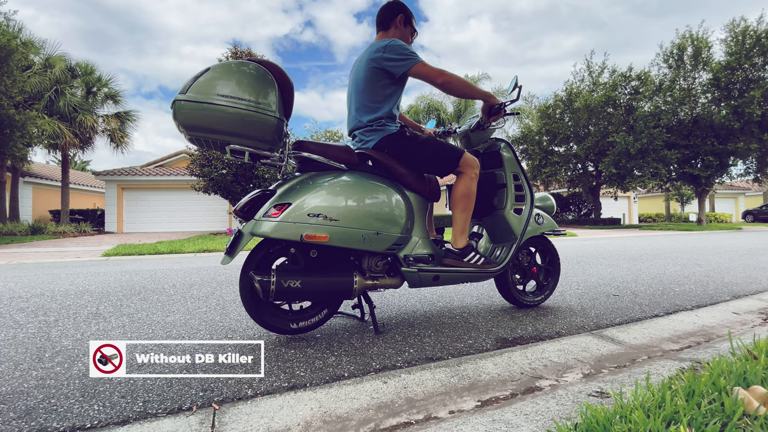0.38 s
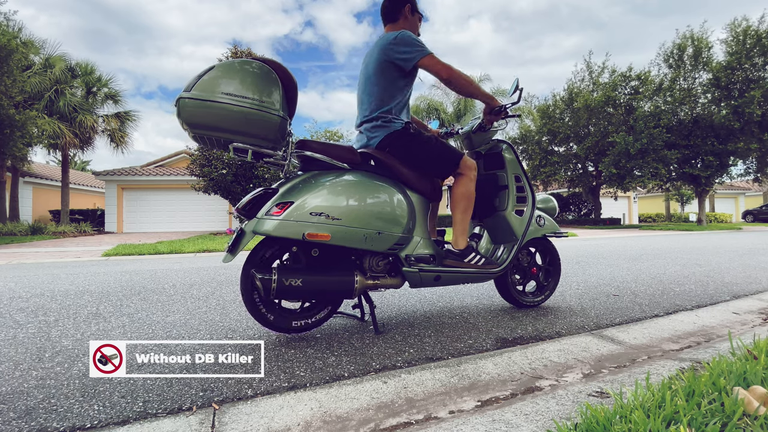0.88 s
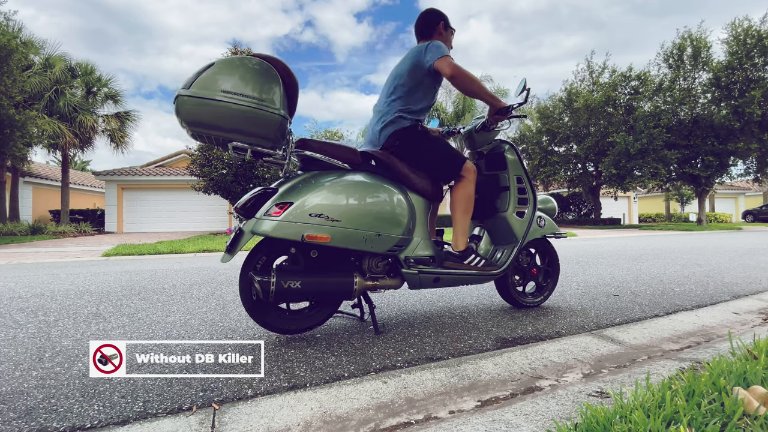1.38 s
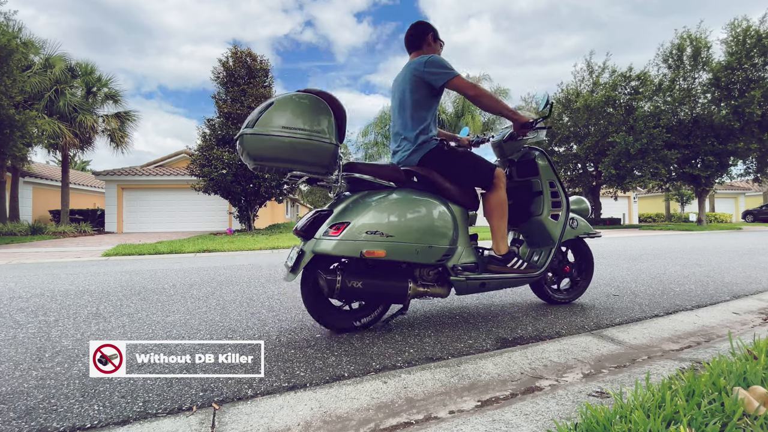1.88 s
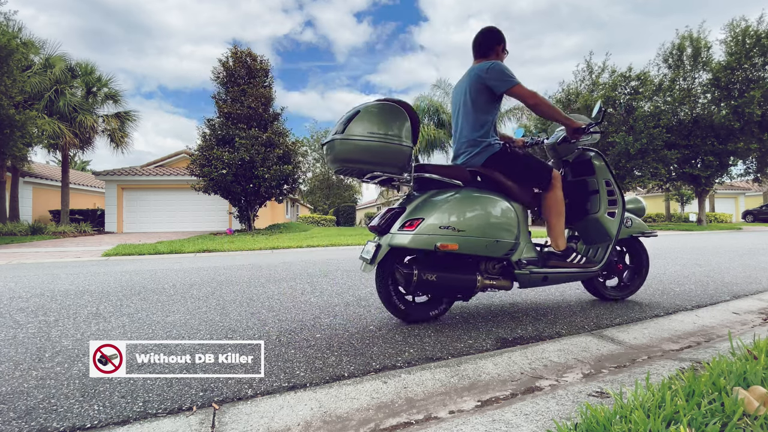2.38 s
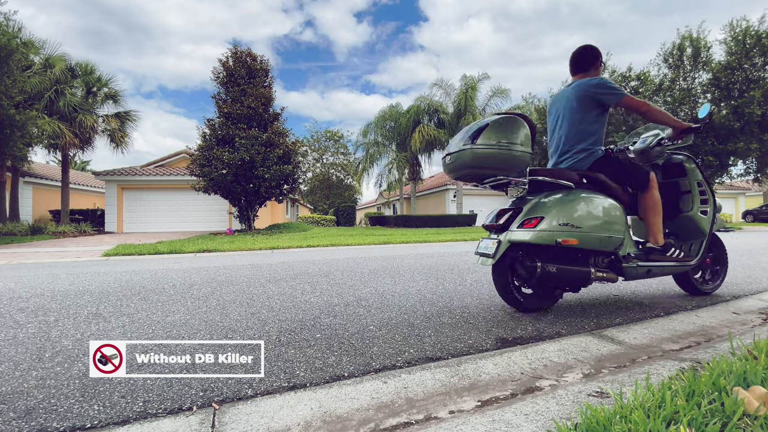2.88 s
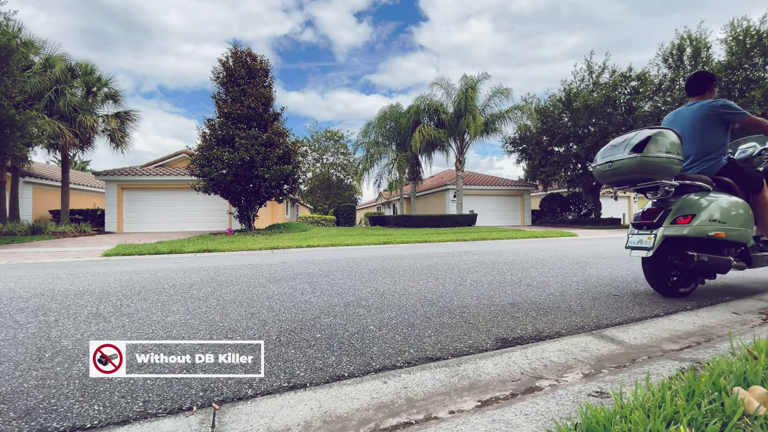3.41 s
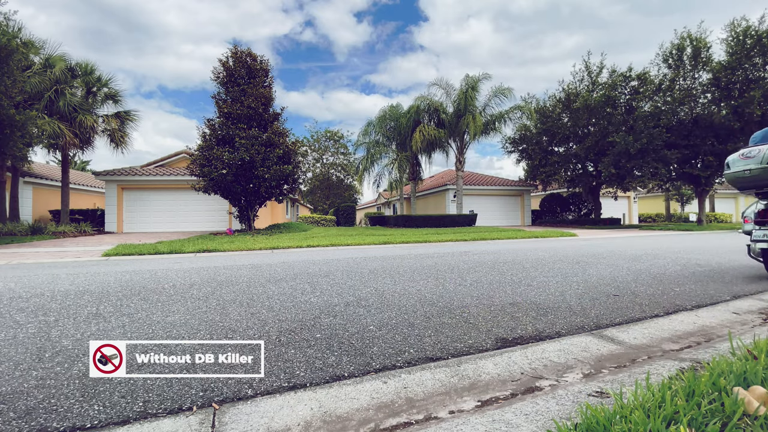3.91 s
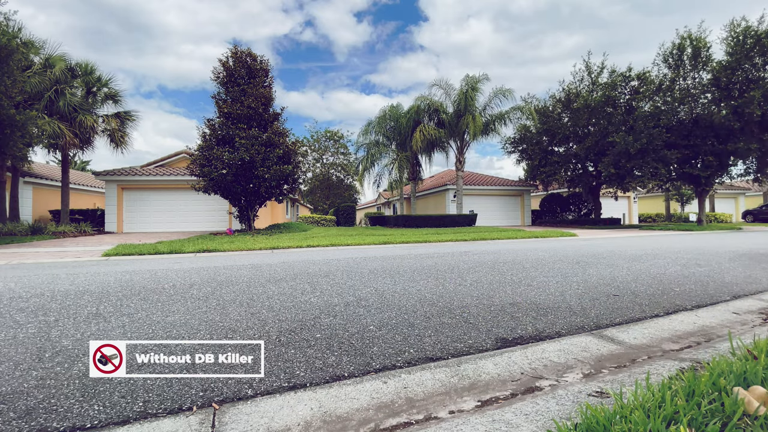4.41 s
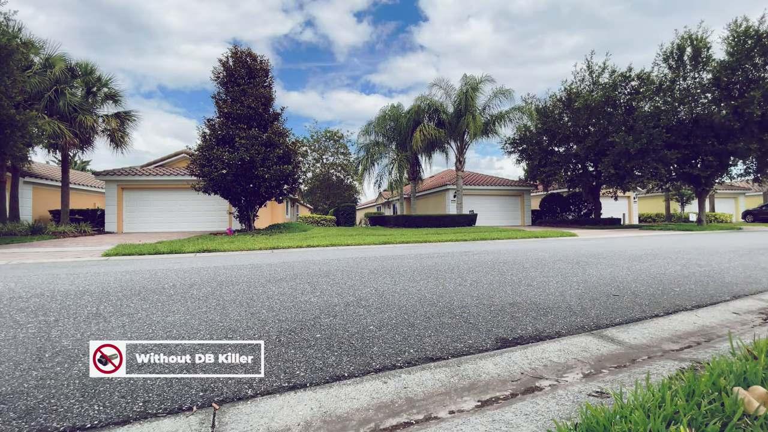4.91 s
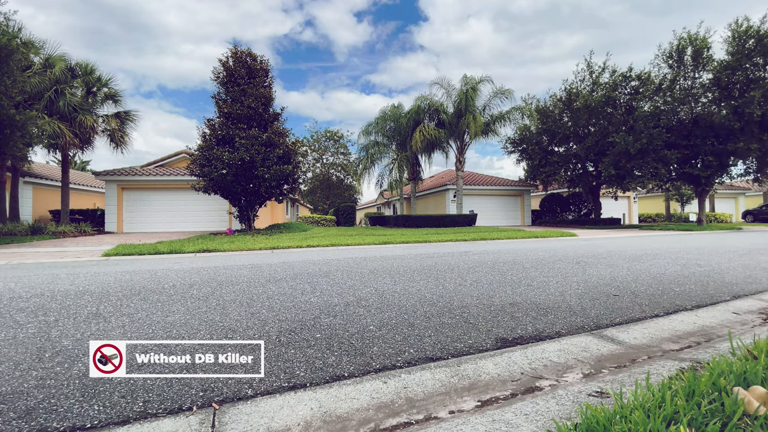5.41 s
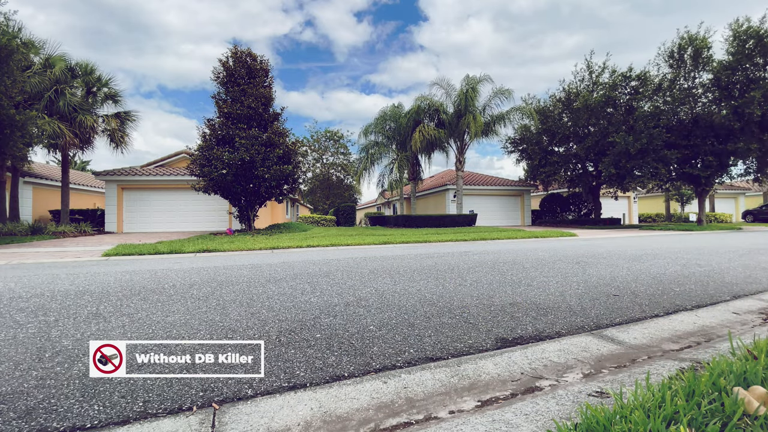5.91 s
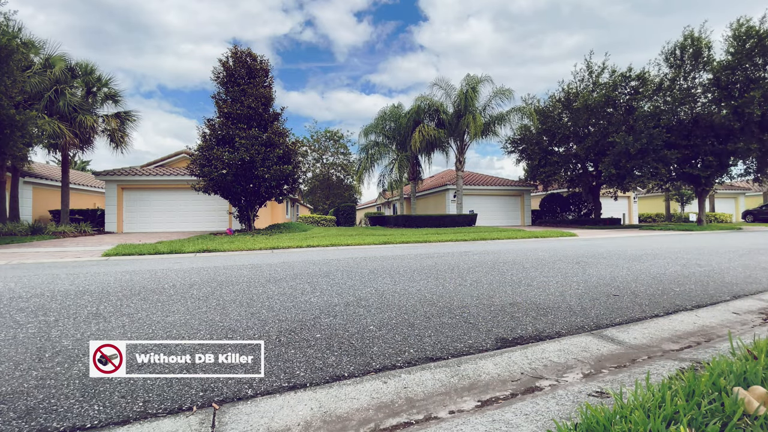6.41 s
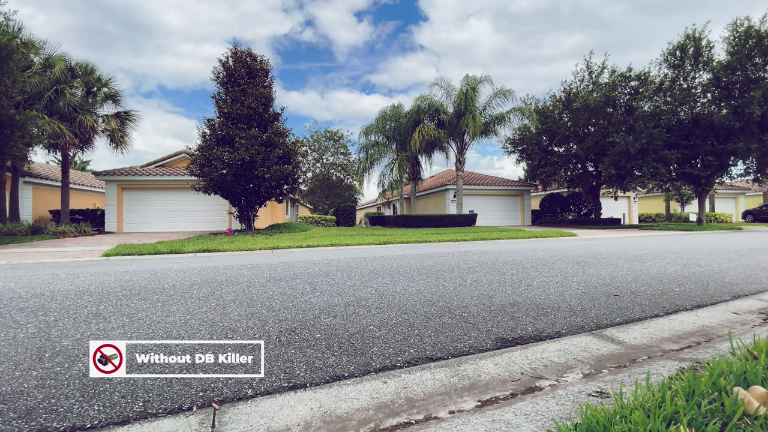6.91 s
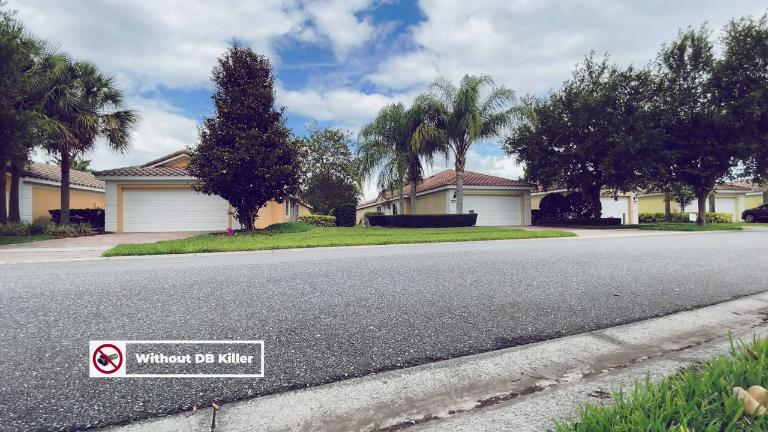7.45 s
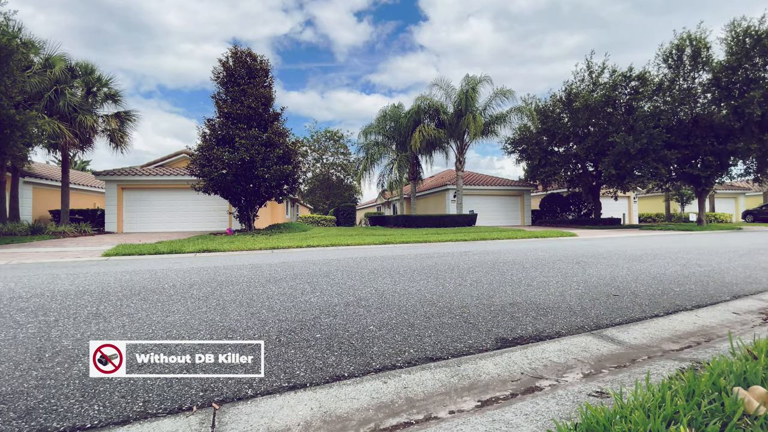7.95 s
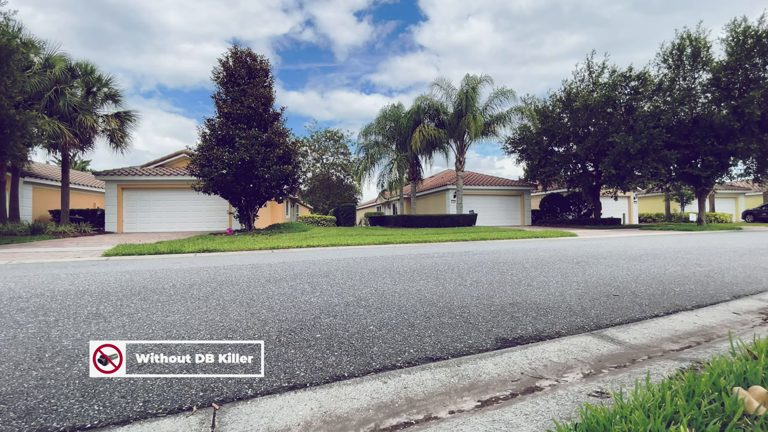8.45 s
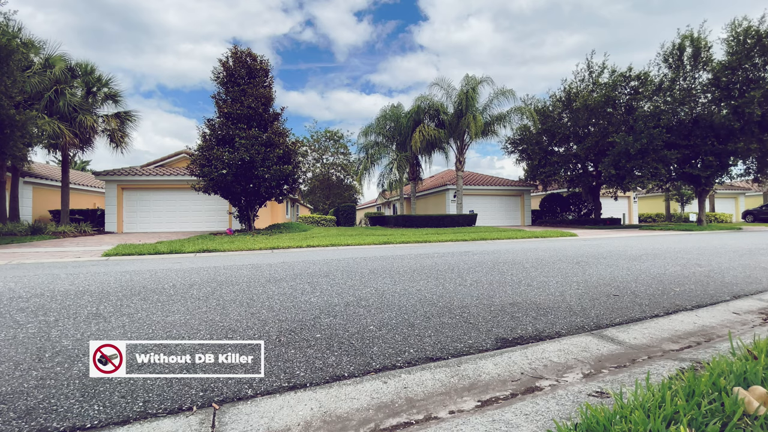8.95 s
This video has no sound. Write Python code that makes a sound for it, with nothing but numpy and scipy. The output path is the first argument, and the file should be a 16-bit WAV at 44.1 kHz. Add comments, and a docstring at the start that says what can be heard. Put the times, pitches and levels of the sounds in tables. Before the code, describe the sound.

A small single-cylinder scooter thumps at a loud open-exhaust idle, scrapes its stand, then barks into full throttle and fades far down the street.

```python
"""Scooter leaving a quiet street

A single-cylinder scooter with an open exhaust idles a few metres off, revs up and rides away down the street.
Each firing sends a gas pulse that rings the pipe and silencer; valve gear clatters and rings the engine casing,
gas hisses and puffs from the outlet, the gears whine in two swells and the stand scrapes.
House fronts return dull echoes over a low street murmur.
Near by, the pulses overload the microphone, which flattens their tops."""
import sys
import numpy as np
from scipy import signal
from scipy.fft import rfft, irfft, next_fast_len
from scipy.io import wavfile

SR = 44100
rng = np.random.default_rng(int(sys.argv[2]) if len(sys.argv) > 2 else 0)


def boost(x):
    """Linear amplitude factor 10**(x/20) for a level x in decibels (scalar or array-like)."""
    u = np.asarray(x, float) / 20
    return 10 ** u


def unload_wav(signal):
    """Save mono or channel-first audio to the path in sys.argv[1] as 16-bit WAV at rate SR, clipped to [-1, 1]."""
    wavfile.write(
        sys.argv[1],
        SR,
        np.round(np.clip(np.atleast_2d(signal).T, -1, 1) * 32767).astype(np.int16),
    )


N = 399987
RUN_IN = SR // 4  # samples computed ahead of time zero and then dropped
LENGTH = N + RUN_IN

# engine speed: (time [s], firings per second [1/s])
FIRING_RATE = [(0.0, 24.67), (0.1, 19.33), (0.36, 15.22), (0.68, 14.09), (1.58, 14.68), (1.69, 13.93),
               (1.88, 25.47), (2.14, 34.55), (2.36, 36.3), (2.99, 36.41), (3.3, 36.16), (3.92, 36.19),
               (4.6, 38.39), (5.2, 39.22), (5.6, 42.71), (5.98, 44.69), (6.45, 44.9), (6.9, 46.25),
               (7.2, 45.71), (9.07, 45.59)]
# throttle: (time [s], opening [0-1])
THROTTLE_OPENING = [(0, .12), (.2, 0), (1.76, 0), (1.85, .35), (1.95, .8), (2.05, 1), (9.07, 1)]
# distance of the exhaust from the kerb: (time [s], distance [m])
DISTANCE_M = [(0, 3.17), (2.7, 3.12), (3.6, 5.7), (4.4, 11), (5.0, 17), (5.4, 25.4), (6.0, 39), (6.5, 52),
              (7.3, 66), (8.4, 97), (9.07, 114)]
# pipe and silencer modes with cool gas at idle: (frequency [Hz], relative level [dB], t60 [s], sign)
COOL_PIPE_MODES = [(50.5, -7.3, 0.069, 1), (88.0, 4.6, 0.096, 1), (114.8, 8.5, 0.059, 1),
                   (189.3, 16.3, 0.022, -1), (285.6, -1.9, 0.052, -1), (355.3, 17.0, 0.023, 1),
                   (437.1, 16.9, 0.013, -1), (593.1, 4.7, 0.035, 1)]
# the same with hot gas under load: (frequency [Hz], relative level [dB], t60 [s], sign)
HOT_PIPE_MODES = [(48.5, -23, 0.14, -1), (93.17, -5, 0.12, 1), (98.1, -10, 0.11, -1),
                  (135.5, -28.5, 0.1, 1), (204.5, 4, 0.022, 1), (243.6, -15, 0.049, -1),
                  (291, -14.5, 0.055, -1), (368.4, 7, 0.035, -1), (445.3, -6.5, 0.061, 1),
                  (575, -1.5, 0.024, -1), (636.7, -3.5, 0.063, -1), (705, -10, 0.051, -1),
                  (1084, -8, 0.05, 1), (1440, -15, 0.048, -1)]
# boom, bark and crack of the exhaust: (level at idle [dB], gain under load [dB], lag behind the throttle [s],
# loss per doubled distance [dB])
EXHAUST_VOICES = [(0.2, 11.5, 0.088, 5), (0.5, 14, 0.013, 6.5), (1.6, 10.5, 0.0059, 6.1)]
# brief swells and dips on the way: (time [s], width [s], boom [dB], bark [dB])
VOICE_SWELLS = [(2.02, 0.075, -1.5, 4), (4.9, 0.14, 2, -0.5), (5.5, 0.23, -2, -4), (6.35, 0.22, 3.5, -3),
                (6.66, 0.11, -1.5, -8), (6.82, 0.076, -10, 7), (7.03, 0.095, -1.5, -18),
                (7.26, 0.047, -2.5, 4.5), (7.66, 0.079, -6.5, 4), (8.08, 0.16, -10.5, 4),
                (8.9, 0.2, -5, 4.5)]
# rasp: gain of the upper modes at full throttle: (time [s], level [dB])
RASP_GAIN = [(0, 7), (2.2, 2.5), (3.5, -1), (4.5, -0.5), (5.3, 6), (6, 6), (7, 3), (8, 1.5), (9.07, 2)]
# mechanical noise: (time [s], clatter [dB], hiss [dB], outlet puff [dB])
MECHANICS_LEVELS = [(0, -39.5, -56, -52), (0.35, -45.5, -58.5, -56), (1.29, -42.5, -59, -54.5),
                    (1.77, -40.5, -54, -51), (2.09, -30.5, -45, -37), (2.4, -27.5, -44, -35),
                    (2.95, -30, -39.5, -41), (3.56, -34.5, -44, -41), (3.91, -38, -48, -45),
                    (4.27, -40, -48.5, -41), (5.1, -42, -50, -46), (5.96, -41.5, -56.5, -61),
                    (6.47, -42, -53.5, -58), (6.85, -44.5, -60.5, -67), (8.46, -55, -70, -84),
                    (9.07, -56, -80, -79)]
# brief rises of clatter and hiss: (time [s], width [s], clatter [dB], hiss [dB])
TICK_GAINS = [(0.0, 0.015, 10, 9.9), (1.845, 0.013, 10.5, 6.2)]
# noise bursts in one engine cycle, over a steady floor, at idle and under load:
# (place [share of cycle], width [share of cycle], clatter [dB], hiss [dB], puff [dB])
IDLE_CYCLE_BURSTS = [(.045, .015, -6, -3, 11), (.36, .06, 4, 2, 10), (.62, .04, -4, -12, -9),
                     (.83, .05, -1, -9, -3)]
LOAD_CYCLE_BURSTS = [(.12, .025, -6, 0, 20), (.6, .12, -6, -12, -9)]
# noise colours: (frequency [Hz], relative level per Hz [dB])
CLATTER_SPECTRUM = [(470, -1), (800, -3.5), (1570, -4), (1810, -5.5), (2350, -3.5), (3080, -6.5),
                    (5250, -12.5), (6770, -22), (7500, -20), (9750, -42), (16500, -120)]
HISS_SPECTRUM = [(3530, -25), (6000, -3.5), (6820, -6.5), (9080, 0.5), (12000, -1), (15600, -32),
                 (22000, -120)]
PUFF_SPECTRUM = [(8000, -32), (10500, -16), (12500, 0), (14500, -1), (16000, -7)]
# engine casing modes rung by the clatter: (frequency [Hz], relative level [dB], t60 [s])
CASING_MODES = [(1410, -4, 0.023), (2004, -5, 0.03), (2314, -4.5, 0.025), (2646, -5, 0.027),
                (2885, -12.5, 0.024), (4420, -6.5, 0.016)]
# gear whine: (time [s], width [s], level [dB])
WHINE_LEVELS = [(6.68, 0.14, -45.5), (7.45, 0.3, -57)]
# the stand scrapes and folds: (start [s], length [s], level [dB])
STAND_SCRAPES = [(1.398, 0.084, -43)]
# metal scrape: (frequency [Hz], relative level per Hz [dB])
SCRAPE_SPECTRUM = [(700, -30), (1300, 4), (3000, -7), (6500, -12), (8700, -6), (11000, -9), (16000, -21)]
# house fronts, whose detour changes: (delay as the run-in starts [s], change of delay [s per s], level [dB])
HOUSE_ECHOES = [(.030, .0015, -5), (.075, -.002, -3), (.050, .003, -3)]
# level of the echoes, faint near by and growing from 3.5 s on: (time [s], level [dB])
ECHO_LEVEL = [(0, -27.5), (3.5, -40), (5, -18), (6.5, -14), (9.07, -9.5)]
# street murmur: (frequency [Hz], relative level per Hz [dB])
STREET_SPECTRUM = [(20, -30), (50, -27), (90, 3), (200, -4.5), (500, 0.5), (1000, -13), (2800, -15.5),
                   (6000, -34), (15500, -42)]

FIRST_TURN, FIRING_DELAY_S = .51, .0011  # engine cycles done at time zero; short delay of the firings
BARK_FROM_HZ, CRACK_FROM_HZ, RASP_FROM_HZ = 150, 300, 430  # modes up to the first belong to the boom
COOL_PULSE_HZ, HOT_PULSE_HZ, OUTLET_HZ = 325, 150, 1750  # low-pass corners
WAVER_DB_PER_100_M, WAVER_HZ, WAVER_FROM_HZ = 2.5, 2.5, 120  # depth, corner of the drift, lower limit
CASING_DB = -8.5  # before the clatter level is applied
WHINE_AT_S, WHINE_HZ, WHINE_HZ_PER_S = 6.7, 1580, 170  # mean pitch at that time, and its rise
STREET_DB = -53
OVERLOAD = 0.28  # ceiling of the microphone, where full scale is 1
SELF_NOISE_DB, LOW_CUT_HZ = -67, 6


def clock():
    """Seconds at each sample, starting before time zero."""
    return (np.arange(LENGTH) - RUN_IN) / SR


def in_time(rows):
    """Columns of a table as curves, starting before time zero."""
    s, *columns = np.transpose(rows)
    return [np.interp(clock(), s, column) for column in columns]


def bells(rows):
    """Each column as a sum of bell-shaped bumps in time."""
    return sum(np.array(heights)[:, None] * np.exp(-.5 * ((clock() - s) / width) ** 2)
               for s, width, *heights in rows)


def rms_one(x):
    """Scale to rms 1."""
    return x / np.sqrt(np.mean(x ** 2) + 1e-20)


def soften(x, hz):
    """Double one-pole low-pass."""
    r = np.exp(-2 * np.pi * hz / SR)
    return signal.lfilter([(1 - r) ** 2], [1, -2 * r, r * r], x)


def drift(hz):
    """Low-passed chance with rms 1."""
    return rms_one(soften(rng.standard_normal(LENGTH), hz))


def coloured(spectrum):
    """White noise shaped to a spectrum; rms 1."""
    size = next_fast_len(LENGTH)
    hz, level_db = np.transpose(spectrum)
    bins_hz = np.arange(1, size // 2 + 2) * SR / size
    shape = boost(np.interp(np.log(bins_hz), np.log(hz), level_db))
    return rms_one(irfft(rfft(rng.standard_normal(size)) * shape, size)[:LENGTH])


def ring(clicks, hz, t60):
    """Resonator: a unit click sets a sine of height 1 ringing, which decays 60 dB in t60 seconds."""
    r, w = boost(-60 / (t60 * SR)), 2 * np.pi * hz / SR
    return signal.lfilter([0, np.sin(w)], [1, -2 * r * np.cos(w), r * r], clicks + 1e-18)


def crank():
    """Engine cycles completed at each sample: the summed firing rate, with a short fixed delay."""
    rate = in_time(FIRING_RATE)[0]
    turns = np.cumsum(rate) / SR
    return turns - turns[RUN_IN] + FIRST_TURN - FIRING_DELAY_S * rate


def per_cycle(turns, spread_db, count):
    """Random gains that hold for one engine cycle; a row each."""
    cycle = np.floor(turns - turns[0]).astype(int)
    luck = rng.standard_normal((cycle[-1] + 1, count))
    return boost(spread_db * luck[cycle].T)


def voices_db(throttle):
    """Each voice gains with load and fades with distance; boom and bark also swell and dip."""
    metres = in_time(DISTANCE_M)[0]
    doublings = np.log2(metres / metres[0])
    out = []
    for idle_db, load_db, lag_s, loss_db in EXHAUST_VOICES:
        load = soften(throttle, 1 / (2 * np.pi * lag_s))
        out.append(idle_db + load_db * load - loss_db * doublings)
    out = np.array(out)
    out[:2] += bells(VOICE_SWELLS)
    return out


def exhaust(turns, throttle):
    """One gas pulse a cycle rings the modes; combustion varies a little from cycle to cycle."""
    firings = np.diff(np.floor(turns), prepend=np.floor(turns[0]))
    firings = firings * per_cycle(turns, spread_db=0.46, count=1)
    boom, bark, crack = firings * boost(voices_db(throttle)) * per_cycle(turns, spread_db=0.23, count=3)
    # the rasp of the upper modes weakens, returns and weakens again during the ride
    rasp = crack * boost(throttle * in_time(RASP_GAIN)[0])
    strikes = boom, bark, crack, rasp
    waver_db = WAVER_DB_PER_100_M * in_time(DISTANCE_M)[0] / 100
    gas_states = ((COOL_PIPE_MODES, 1 - throttle, COOL_PULSE_HZ),
                  (HOT_PIPE_MODES, throttle, HOT_PULSE_HZ))
    out = np.zeros(LENGTH)
    for modes, share, pulse_hz in gas_states:
        for hz, level_db, t60, sign in modes:
            voice = np.searchsorted([BARK_FROM_HZ, CRACK_FROM_HZ, RASP_FROM_HZ], hz)
            pulses = strikes[voice]
            if hz > WAVER_FROM_HZ:  # far off, moving air makes these modes waver
                pulses = pulses * boost(waver_db * drift(WAVER_HZ))
            ringing = ring(pulses * share, hz, t60)
            out += np.sign(sign) * boost(level_db) * soften(ringing, pulse_hz)
    return soften(out, OUTLET_HZ)


def gates(turns, bursts, spread_db):
    """Steady floor plus bell-shaped bursts at fixed crank angles, of varying strength; a row per layer."""
    out = np.ones((3, LENGTH))
    luck = per_cycle(turns - turns[0] % 1, spread_db, count=len(bursts))
    for (angle, width, *layers_db), gain in zip(bursts, luck):
        bell = np.exp(-.5 * ((turns % 1 - angle) / width) ** 2)
        out += boost(np.array(layers_db))[:, None] * gain * bell
    return out / np.sqrt(np.mean(out ** 2, axis=1, keepdims=True))


def rattle(gate):
    """Uneven metal taps, denser in the bursts, ring the casing; rms 1."""
    struck = rng.random(LENGTH) < 900 * gate ** 2 / SR  # 900 taps a second where the gate is 1
    strength = boost(2.8 * np.minimum(rng.exponential(1, LENGTH), 3))
    taps = struck * strength * rng.choice([-1, 1], LENGTH)
    dealt = rng.integers(0, len(CASING_MODES), LENGTH)  # each tap rings one mode
    return rms_one(sum(boost(level_db) * ring(taps * (dealt == k), hz, t60)
                       for k, (hz, level_db, t60) in enumerate(CASING_MODES)))


def mechanics(turns, throttle):
    """Valve clatter, gas hiss and outlet puffs throb with the crank and flutter in the moving air."""
    clatter_db, hiss_db, puff_db = in_time(MECHANICS_LEVELS)
    clatter_db, hiss_db = (clatter_db, hiss_db) + bells(TICK_GAINS)
    idle_gate = gates(turns, IDLE_CYCLE_BURSTS, spread_db=2.3)
    load_gate = gates(turns, LOAD_CYCLE_BURSTS, spread_db=1.2)
    clatter_gate, hiss_gate, puff_gate = (1 - throttle) * idle_gate + throttle * load_gate
    flutter = drift(9.7)  # shared by all three layers
    clatter = clatter_gate * coloured(CLATTER_SPECTRUM) + boost(CASING_DB) * rattle(clatter_gate)
    clatter = boost(clatter_db + 0.7 * flutter + 0.58 * drift(140)) * clatter
    hiss = boost(hiss_db + 1.0 * flutter + 1.3 * drift(130)) * hiss_gate * coloured(HISS_SPECTRUM)
    puff = boost(puff_db + .8 * flutter) * puff_gate * coloured(PUFF_SPECTRUM)
    return clatter + hiss + puff


def gears():
    """A thin, slightly unsteady sine whose mean pitch rises steadily, heard in two swells."""
    hz = WHINE_HZ + WHINE_HZ_PER_S * (clock() - WHINE_AT_S) + 4.07 * drift(19.0)
    level = bells([(s, width, boost(level_db)) for s, width, level_db in WHINE_LEVELS])[0]
    level = level * boost(2.3 * drift(25))
    return np.sqrt(2) * level * np.sin(2 * np.pi * np.cumsum(hz) / SR)


def stand():
    """A short bright scrape of metal: coloured noise under a flat-topped envelope."""
    shape = 0
    for start, length, level_db in STAND_SCRAPES:
        from_middle = (clock() - start - length / 2) / (length / 2)
        shape = shape + boost(level_db) * np.exp(-from_middle ** 4)
    return shape * coloured(SCRAPE_SPECTRUM)


def houses(x):
    """A few dull echoes with sliding delays; they make the far harmonics swell and fade."""
    dull, at = soften(x, 590), np.arange(LENGTH)
    echoes = 0
    for delay_s, change, level_db in HOUSE_ECHOES:
        heard_from = at * (1 - change) - delay_s * SR
        echoes = echoes + boost(level_db) * np.interp(heard_from, at, dull)
    return boost(in_time(ECHO_LEVEL)[0]) * echoes


def street():
    """Low murmur of the street: coloured noise whose level drifts slowly."""
    return boost(STREET_DB + 2.5 * drift(0.72)) * coloured(STREET_SPECTRUM)


def scene():
    """Scooter, its echoes and the street, from time zero on."""
    turns, throttle = crank(), np.clip(in_time(THROTTLE_OPENING)[0], 0, 1)
    scooter = exhaust(turns, throttle) + mechanics(turns, throttle) + gears() + stand()
    return (scooter + houses(scooter) + street())[None, RUN_IN:]


def top_cut(x):
    """Nothing passes above the cut-off."""
    return signal.sosfilt(signal.butter(12, 15770, fs=SR, output="sos"), x)


def record(dry):
    """The microphone overloads with a sharp knee; the stage after it adds faint hiss and cuts the deepest bass."""
    knee = 5.0  # higher is sharper
    flat = dry / (1 + np.abs(dry / OVERLOAD) ** knee) ** (1 / knee)
    flat = flat + boost(SELF_NOISE_DB) * rng.standard_normal(dry.shape)
    mix = signal.lfilter(*signal.butter(1, LOW_CUT_HZ, "high", fs=SR), flat)
    return top_cut(mix)


dry = scene()
out = record(dry)
unload_wav(out)
```